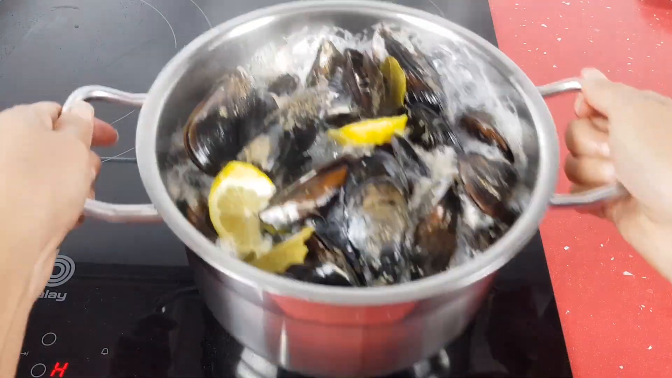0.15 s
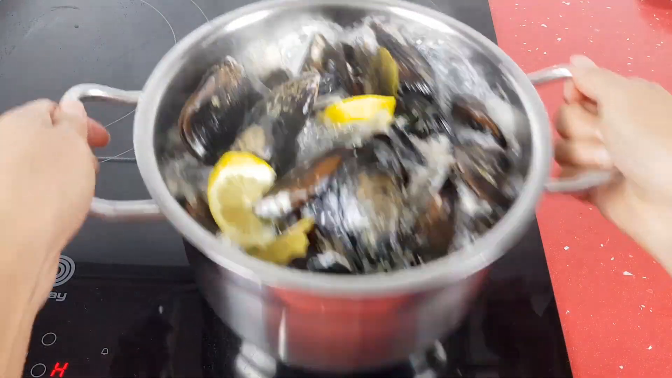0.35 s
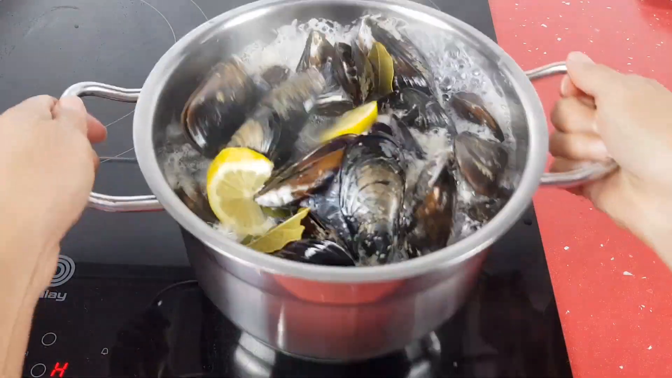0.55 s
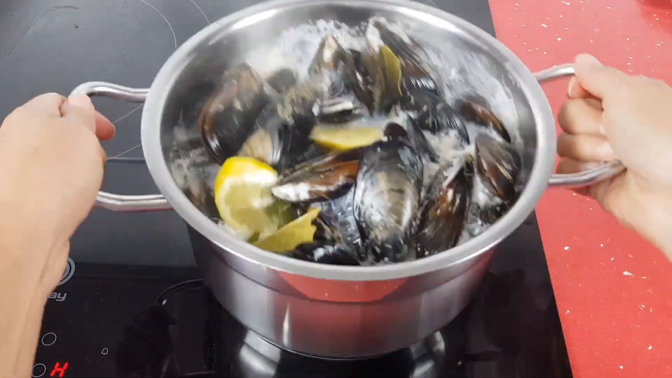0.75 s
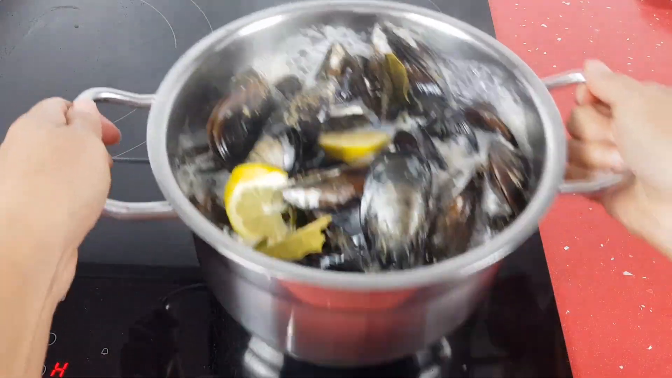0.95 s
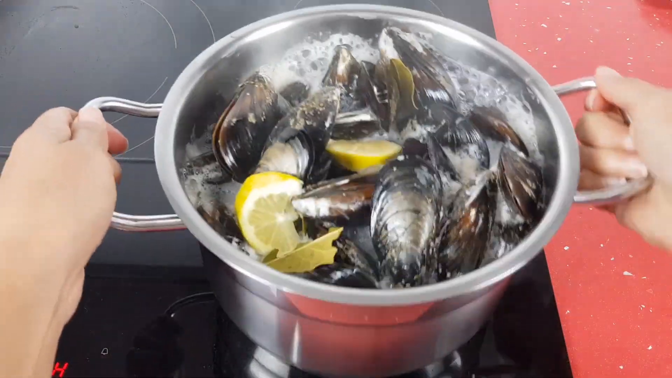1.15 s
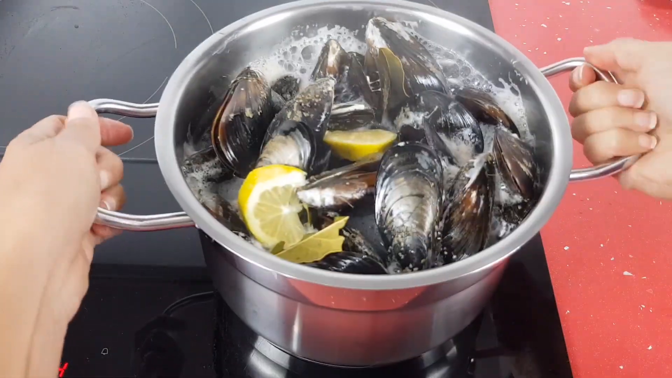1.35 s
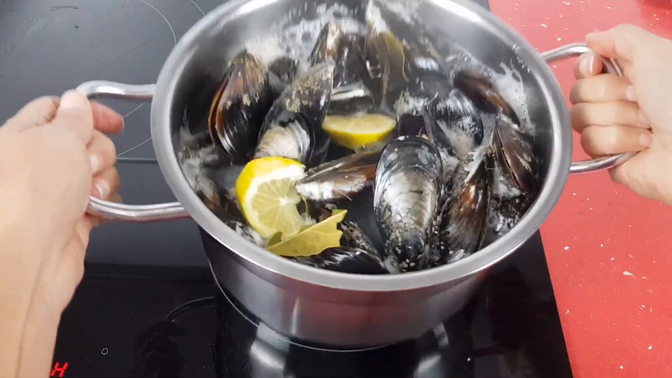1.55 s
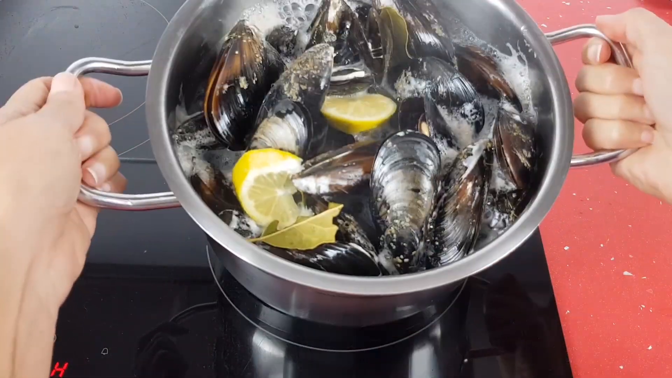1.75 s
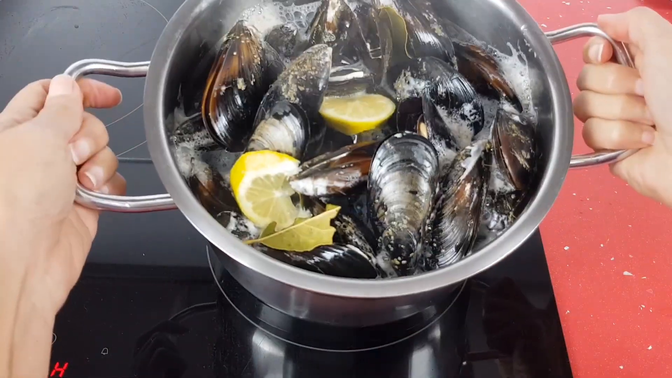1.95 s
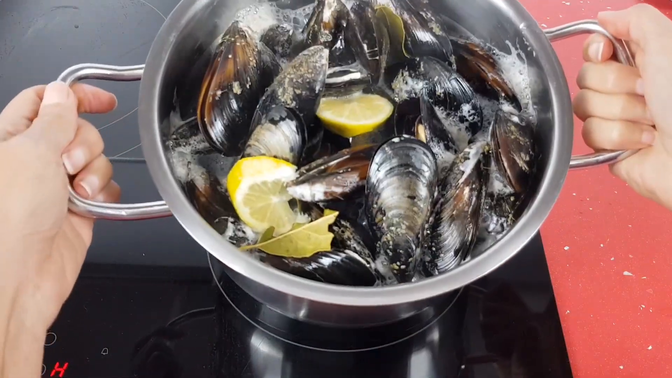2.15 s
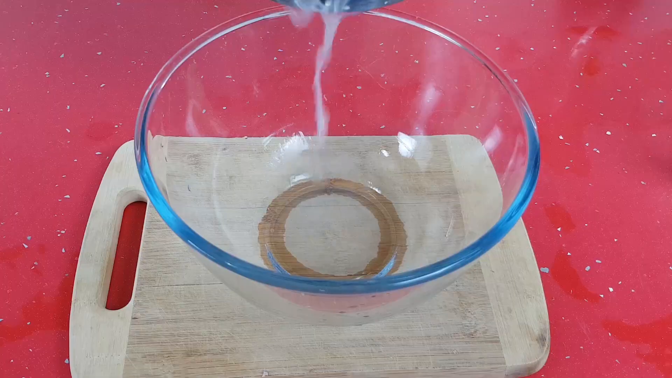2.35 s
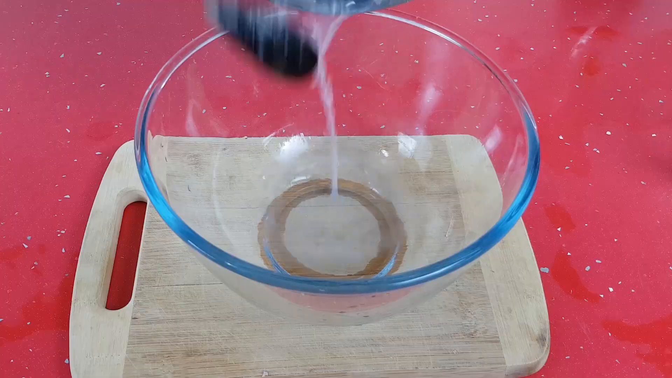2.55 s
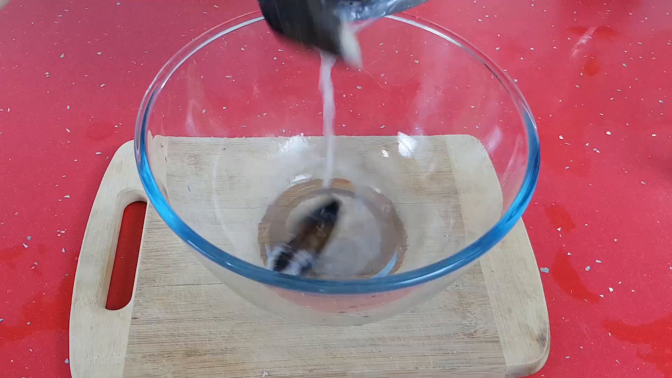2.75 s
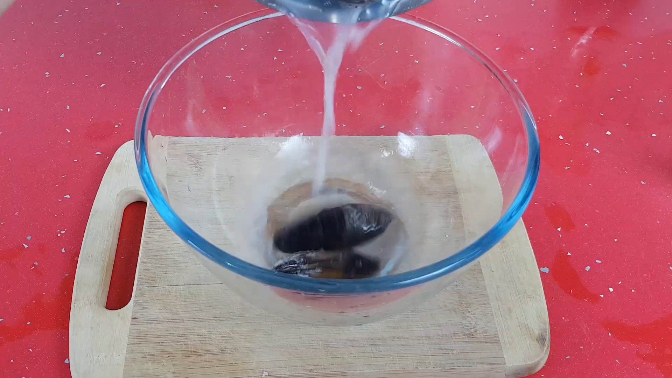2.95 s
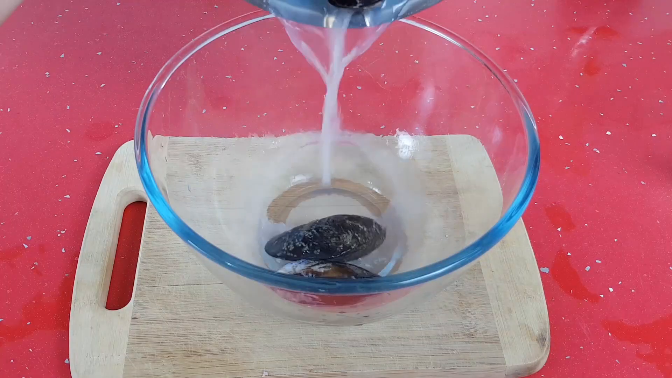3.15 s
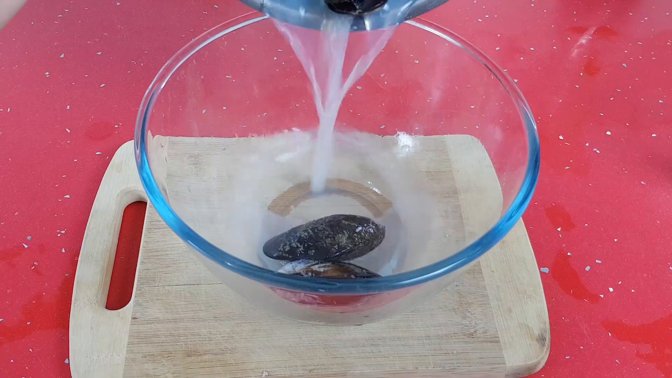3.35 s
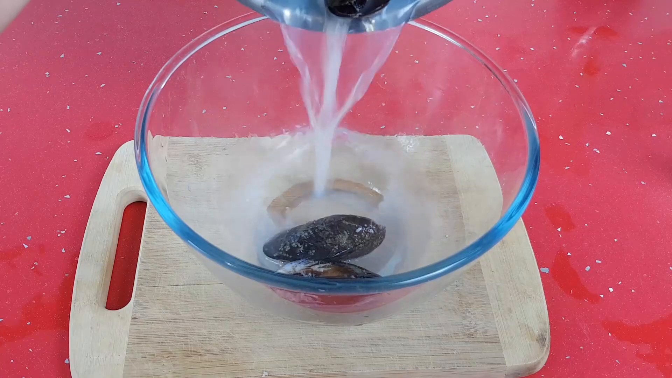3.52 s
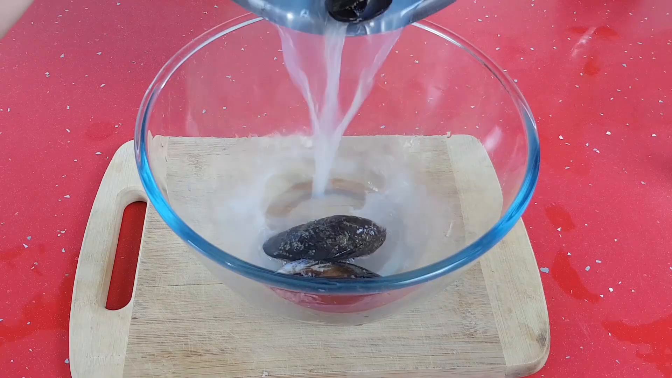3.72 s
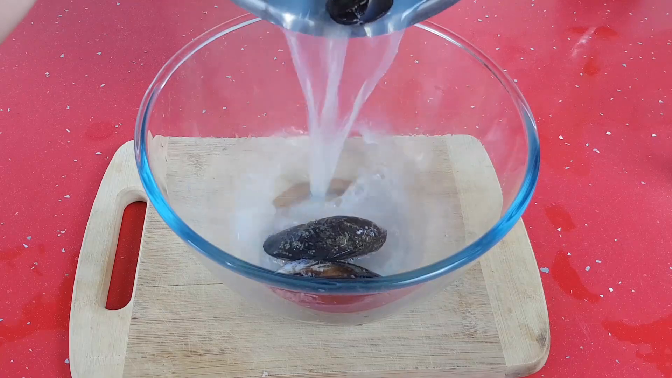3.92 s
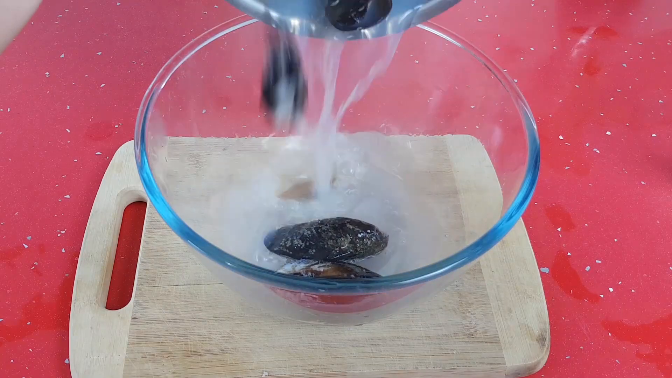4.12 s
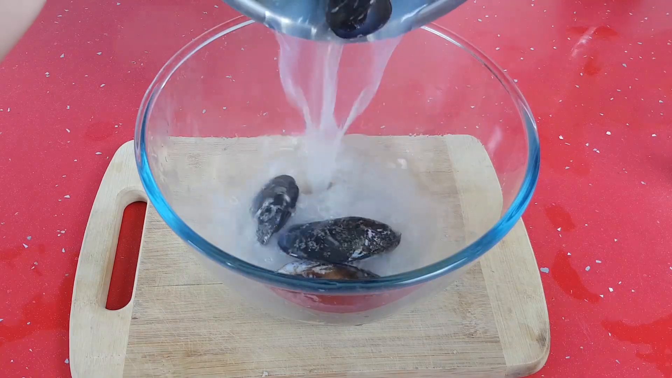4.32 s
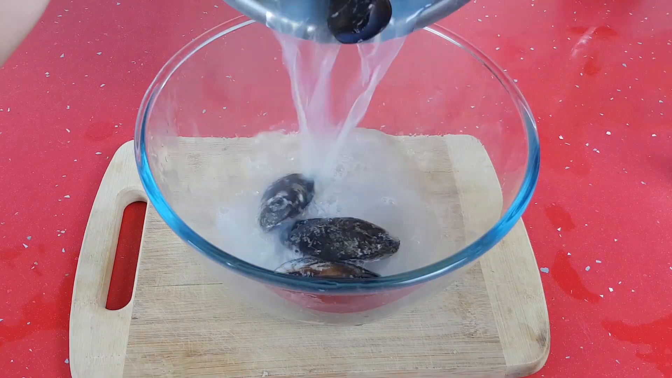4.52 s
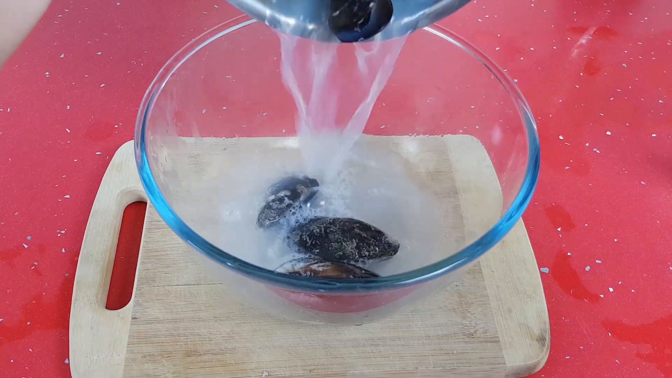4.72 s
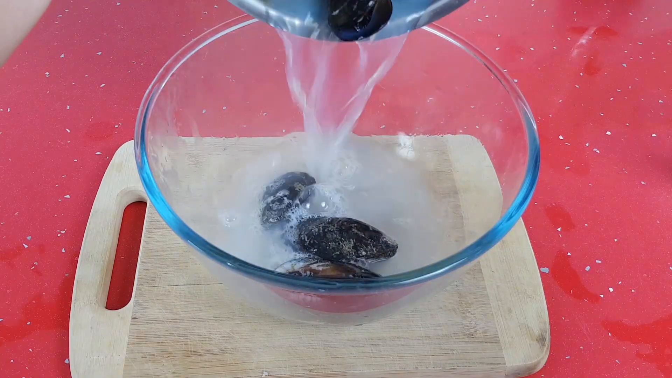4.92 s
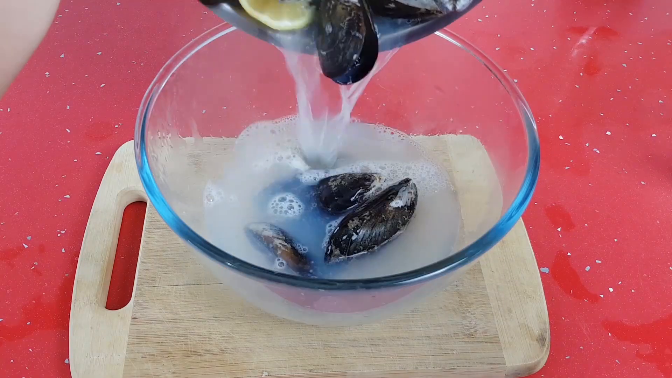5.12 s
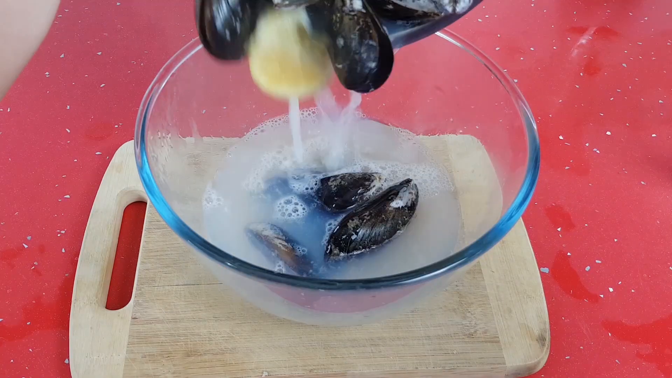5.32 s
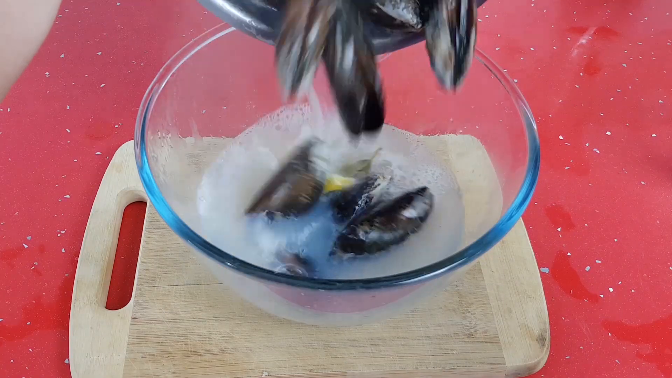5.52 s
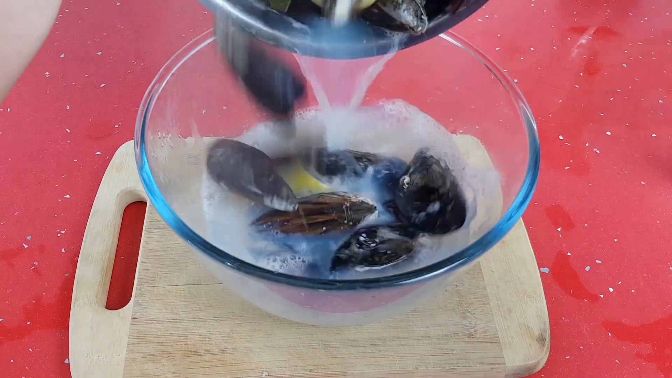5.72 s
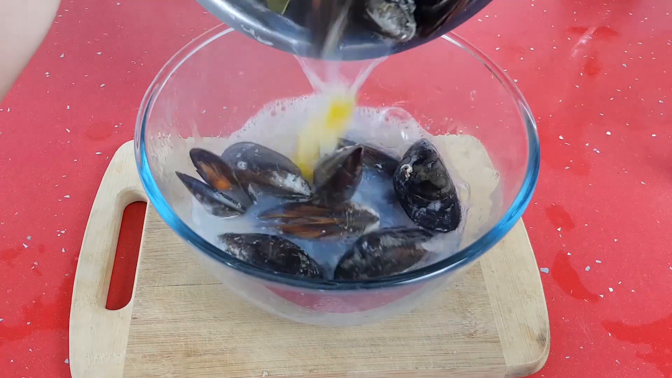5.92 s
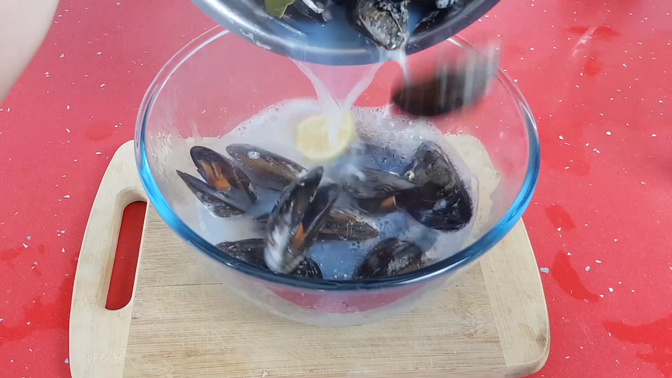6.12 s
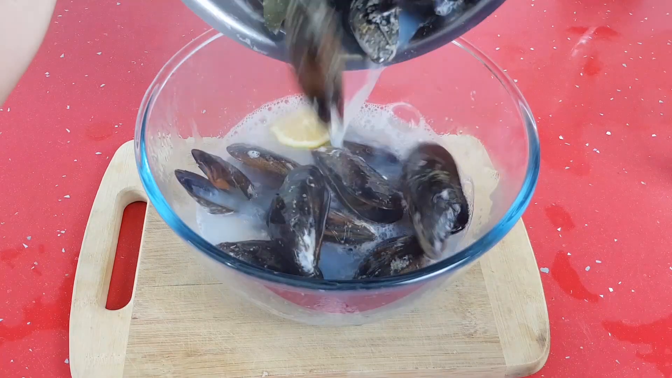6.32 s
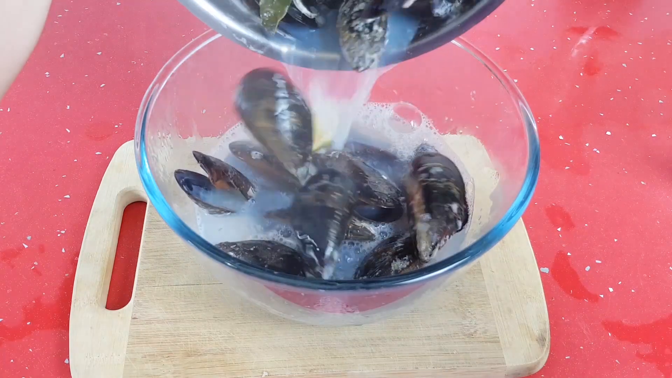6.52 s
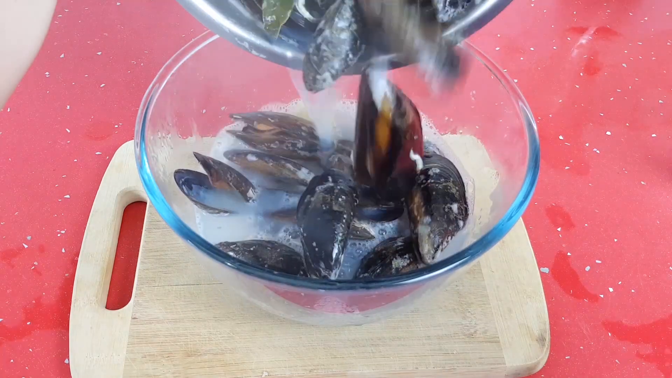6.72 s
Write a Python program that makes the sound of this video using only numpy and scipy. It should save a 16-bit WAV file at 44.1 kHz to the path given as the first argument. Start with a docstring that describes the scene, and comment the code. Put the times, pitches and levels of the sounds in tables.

```python
"""Mussels from pot to bowl

A steel pot of simmering mussels is shaken on a humming hob, then emptied into a glass bowl on a board.
Shells are filtered noise bursts and paired tones: early ones ring bare glass, the rest clatter on the heap.
Broth trickles in as swarms of rising bubble tones and ticks; foam fizzes in the pot before that.
Worktop, bowl and board are banks of dying sines; a small hard kitchen adds a short noise tail."""
import sys
import numpy as np
from scipy import signal
from scipy.fft import rfft, irfft
from scipy.io import wavfile

SR = 44100
rng = np.random.default_rng(int(sys.argv[2]) if len(sys.argv) > 2 else 0)


def digitize_waveform(pressure):
    """Quantize a signal to 16-bit integers and store it at the path in sys.argv[1].

    Rows of a 2-D input are taken as channels; values are limited to [-1, 1].
    """
    field = np.atleast_2d(pressure).T
    bounded = np.clip(field, -1, 1)
    quanta = np.round(bounded * 32767).astype(np.int16)
    wavfile.write(sys.argv[1], SR, quanta)


N = 298557
TIME = np.arange(N) / SR

# All levels are relative: each layer adds its own trim.
# shells landing and colliding; hardness is the sharp edge against the body of the blow:
# (time [s], level [dB], pitch [Hz], hardness [dB])
SHELL_HITS = [(2.387, -30, 1590, -15.5), (2.537, -27, 3260, 1.5), (2.559, -29.5, 1597, -22),
              (2.605, -37.5, 1680, -14), (2.749, -31, 3650, 1), (2.81, -30, 2320, -20),
              (2.82, -23.5, 2470, -11), (2.831, -16, 1723, 6.5), (2.84, -22, 1710, -13),
              (2.99, -31, 1700, -31), (3.046, -18.5, 1556, -1), (3.056, -16.5, 1700, -15),
              (3.061, -19, 1760, 7), (3.076, -18, 670, -5), (3.097, -31, 1720, -14),
              (3.156, -22.5, 1700, -30), (3.17, -16, 3740, -8), (3.177, -27.5, 1610, -18),
              (4.235, -38, 2280, -6), (4.368, -22.5, 2590, -7.5), (4.383, -32.5, 2690, -24),
              (4.406, -39.5, 2360, -4), (4.446, -39, 740, -26), (4.459, -40.5, 1460, -24),
              (5.557, -27, 2045, -6), (5.667, -20.5, 980, -8), (5.736, -21, 2570, 1.5),
              (5.78, -16, 880, -2.5), (5.797, -16, 2760, -20), (5.832, -18.5, 2210, 5),
              (5.84, -17, 920, -4.5), (5.855, -23, 740, -9), (5.865, -22.5, 870, -2.5),
              (5.869, -16.5, 2256, -22), (5.89, -22, 890, -10), (5.897, -24.5, 970, -20),
              (5.943, -14.5, 1386, 1), (5.966, -19.5, 1284, -15), (5.992, -22, 2340, 3),
              (6.036, -23.5, 3090, -2), (6.053, -18, 1297, -3), (6.059, -17.5, 1804, -8),
              (6.129, -25, 1990, -4.5), (6.212, -20, 1800, 4.5), (6.26, -28, 2380, -10),
              (6.304, -31, 1370, -10), (6.345, -14.5, 2160, -9), (6.357, -13.5, 2327, -6),
              (6.564, -26.5, 3950, -10), (6.638, -26.5, 3780, 5), (6.662, -32.5, 2740, 5),
              (6.755, -37, 2040, -25)]
# colour of the shell blows: (frequency [Hz], level [dB])
SHELL_COLOUR = [(100, 5), (250, -17), (400, -2.5), (560, -5), (820, -1), (1150, 1), (1450, 3), (1900, 0),
                (2500, 1), (3600, -2.5), (6000, 1), (9000, -3), (12000, -4), (16000, -9.5)]
# a shell strikes bare glass: (time [s], level [dB])
GLASS_HITS = [(2.538, -58), (2.835, -20.5), (2.838, -13), (3.048, -23), (3.059, -18), (3.173, -40)]
# higher modes of the bowl: (frequency [Hz], level [dB], T60 [s])
BOWL_MODES = [(1380, -36, 0.36), (1590, -28.5, 0.28), (1570, -8.5, 0.19), (1660, -5, 0.16),
              (1840, -7, 0.16), (1910, -13, 0.15), (2400, -27, .2), (2690, -3.5, 0.13), (3400, -15.5, 0.37),
              (4990, -22, 0.64), (6460, -26.5, 0.22), (6500, -13.5, 0.087), (7300, -25.5, 0.11),
              (7900, -0.5, 0.073), (8600, -8.5, 0.08), (8400, -12.5, 0.14), (9120, 5, 0.066),
              (10300, -8, 0.071), (9938, -9, 0.14), (10850, -4.5, 0.23), (11540, -10.5, 0.16),
              (12000, 0.5, 0.1), (12800, -4, 0.17), (14010, -23, .22), (14700, -3, .18), (15720, -32, 0.34)]
# lowest mode of the bowl, the whole rim flexing: (frequency [Hz], level [dB], T60 [s])
RIM_MODE = [(468, -6.5, 1.84)]
# modes of the wooden board under the bowl: (frequency [Hz], level [dB], T60 [s])
BOARD_MODES = [(62, -11, .3), (90, -3.5, 0.47), (128, 3.5, 0.25), (149, 2.5, .14)]
# a loaded bowl presses harder on the board: (time [s], level [dB])
BOARD_LOAD = [(4.4, -2), (5.9, 3)]
# pot knocks on the hob, and shells clinking on its steel wall; a hard blow is bright, a soft one mostly booms:
# (time [s], level [dB], hardness [dB])
POT_KNOCKS = [(0.223, -45, -5.5), (0.326, -41.5, 3), (0.448, -40, -2), (0.557, -39, -3), (0.681, -41, -3.5),
              (0.733, -34.5, 19), (0.786, -38, 7), (0.801, -38.5, 11.5), (0.916, -44, -5),
              (1.02, -42.5, -0.5), (1.138, -40.5, -1), (1.201, -36.5, -2.5), (1.264, -29.5, 5.5),
              (1.535, -63, -23), (1.601, -49, -7.5), (1.711, -53.5, 12.5), (1.811, -56.5, -13)]
# colour of the pot knocks: (frequency [Hz], level [dB])
POT_COLOUR = [(100, 2), (220, -3.5), (340, 2), (480, -1.5), (750, -5), (1200, 2.5), (1800, 1.5), (2500, -2),
              (3500, -4), (5000, 3), (8000, 1.5), (12000, -2), (16000, -7)]
# modes of hob and worktop: (frequency [Hz], level [dB], T60 [s])
WORKTOP_MODES = [(55, -19.5, 0.24), (81.2, 0.5, 0.21), (84.75, 5, 0.7), (106.5, 5, 0.17), (135, -3.5, 0.33),
                 (187.4, -10, 0.44), (312, -16, 0.46), (334.5, -7.5, 0.21), (406, -30, 0.17),
                 (487, -3.5, 0.28)]
# the broth gulps a pocket of air: (time [s], level [dB], starting pitch [Hz], T60 [s])
AIR_GULPS = [(1.711, -24.5, 403, 0.051), (5.668, -15.5, 688, 0.027), (5.866, -12, 802, 0.074),
             (5.95, -28, 960, 0.14), (6.06, -10, 866, 0.028), (6.226, -13.5, 767, 0.078),
             (6.578, -14.5, 847, 0.018)]
# the stream slaps into the shallow broth, lower as it deepens: (time [s], level [dB], bubble pitch [Hz])
SPLASH_HITS = [(3.732, -46, 2460), (3.747, -43, 2500), (3.773, -44.5, 2590), (3.879, -45, 2060),
               (3.905, -51, 2180), (3.99, -51.5, 2540), (4.044, -36, 2960), (4.13, -44.5, 2480),
               (4.293, -49, 2360), (4.756, -57, 1160), (4.883, -53, 970), (5.272, -45, 1150),
               (5.321, -45, 1150), (5.345, -52, 1150)]
# the quick run of bubbles a splash sets off: (delay [s], pitch ratio [1], level [dB])
BUBBLE_RUN = [(0, 1.027, 16.5), (.002, 0.93, 13.5), (.005, 1.1, -5), (.016, 0.98, -7)]
# strength of the falling stream: (time [s], level [dB])
POUR_LEVEL = [(2.4, -50.5), (2.6, -65), (2.85, -41.5), (3.0, -56), (3.4, -74), (3.8, -55.5), (4.0, -75),
              (4.13, -58), (4.46, -54), (4.65, -59), (5.25, -60.5), (5.6, -48.5), (6.77, -52)]
# fine spray, highest where the stream hits a shell: (time [s], level [dB])
SPRAY_LEVEL = [(2.4, -72.5), (2.8, -50.5), (3.4, -71.5), (3.87, -52.5), (4.05, -67.5), (4.4, -55),
               (4.6, -66.5), (4.72, -62), (4.95, -76), (5.3, -55.5), (6.77, -68.5)]
# colour of the stream's bubbles and patter: (frequency [Hz], level [dB])
BURBLE_COLOUR = [(200, -7.5), (330, 3), (480, -3.5), (680, 0.5), (850, -9.5), (1100, 3), (1350, 4),
                 (1650, -7.5), (2100, 1.5), (2450, 3), (2900, -9), (3500, -14), (5000, -4), (8000, -34)]
# colour of the fine spray: (frequency [Hz], level [dB])
SPRAY_COLOUR = [(1500, -36.5), (3000, 6.5), (4500, -9), (7000, 5.5), (10000, -1), (12500, 3.5), (16000, -7)]
# colour of the fizzing foam: (frequency [Hz], level [dB])
FIZZ_COLOUR = [(1500, -30), (3000, -19), (5000, -18), (6500, -8), (8000, -7), (9500, -8), (12000, -5),
               (16000, -8.5)]
# the fizz has a brighter band that sinks as the pot is lifted: (time [s], frequency [Hz])
FIZZ_BAND = [(1.7, 9500), (2.05, 8000)]
# the broth swings as the pot is shaken, and again as it is lifted:
# (start [s], length before the fade [s], level [dB])
SLOSH_SWINGS = [(0.271, 1.114, -51.5), (1.696, 0.027, -42.5)]
# colour of the sloshing broth: (frequency [Hz], level [dB])
SLOSH_COLOUR = [(120, 5), (200, 7), (340, -2), (480, -3), (750, -5.5), (1100, -1), (1600, -9), (2500, -6),
                (4000, -15), (6000, -21), (10000, -41)]
# hum while the pot moves about on the hob: (time [s], level [dB])
HUM_LEVEL = [(0.0, -53.5), (0.26, -56), (0.43, -55), (1.29, -42), (1.81, -57.5), (2.09, -49), (2.36, -52)]
# colour of the still room air: (frequency [Hz], level [dB])
AIR_COLOUR = [(20, -28.5), (48, 7), (70, -17.5), (110, -6.5), (200, -9.5), (450, -14), (750, -21.5),
              (1500, -26.5), (3500, -31), (8000, -28.5), (16000, -33.5)]
# how fast the kitchen's echoes die: (frequency [Hz], T60 [s])
KITCHEN_T60 = [(100, 0.66), (260, 0.33), (700, 0.39), (1840, 0.28), (4850, 0.31), (12800, 0.2)]
# likeness of diffuse sound at the two microphones: (frequency [Hz], correlation [0-1])
MIC_LIKENESS = [(100, 0.93), (300, 0.94), (700, 0.4), (1500, 0.16), (5000, 0.1)]

# between these times [s] a landing goes from lone shell to shell on the heap
FILL_S = (2.84, 3.3)
# lone, then on the heap: knock [dB re ring] and thud [dB re shell level]
CLACK_KNOCK_DB, CLACK_THUD_DB = (-6.5, 2), (-14, -9.5)
# shells lower than this pitch thud more
SHELL_HZ, WEIGHT_DB_PER_OCTAVE = 1800, 3
# broth covers the bottom of the bowl and mutes the glass
MUTE_AT_S, MUTE_OVER_S, MUTED_DB = 3.38, 0.16, -15
# what thud and boom lose per dB of a pot knock's hardness
THUD_LOSS, BOOM_LOSS = 0.49, 0.77
SLOSH_RISE_S, SLOSH_FADE_DB_PER_S = 0.022, 141
FOAM_RISE_S, FOAM_DB, FOAM_FADE_DB_PER_S = 0.072, -61.5, 1
# the fizz ends and the hum starts sinking to its far level
LEAVE_S, FAR_HUM_DB, HUM_FADE_S = 2.4, -61.5, 0.3
EDGE_HZ = 16000  # upper band limit


def shells(clack_db=0.0, left_db=0.2, bowl_db=-53, rim_db=-62, board_db=-34, room_db=-4):
    """Each shell cracks and rings briefly; the blow faintly drives the modes of bowl and board."""
    out, pushes = np.zeros((2, N)), np.zeros(N)
    for s, db, hz, hard_db in SHELL_HITS:
        load_db = np.interp(s, *np.transpose(BOARD_LOAD))
        add(out, s, amp(db + clack_db) * clack(s, hz, hard_db))
        add(pushes, s, amp([db + board_db + load_db]))
    balance = amp([[left_db / 2], [-left_db / 2]])
    out = colour(balance * out, SHELL_COLOUR)
    bowl = amp(bowl_db) * convolve(out, ring(BOWL_MODES))
    rim = amp(rim_db) * convolve(out, ring(RIM_MODE, size=80000)) / 2
    out += free_glass() * (bowl + rim)
    return out + amp(room_db) * kitchen(out) + convolve(pushes, ring(BOARD_MODES))


def clack(s, hz, hard_db, shell_t60=0.038, cycles=36):
    """One shell lands: small ones die sooner, heavy ones thud, and a fuller bowl turns ring into knock."""
    knock_db = np.interp(s, FILL_S, CLACK_KNOCK_DB)
    ring_db = -10 * np.log10(1 + amp(knock_db) ** 2)  # ring and knock share the strength
    thud_db = np.interp(s, FILL_S, CLACK_THUD_DB) + WEIGHT_DB_PER_OCTAVE * np.log2(SHELL_HZ / hz)
    tone = amp(ring_db) * valves(hz, min(shell_t60, cycles / hz))
    return tone + contact(ring_db + knock_db, thud_db, hard_db, 0.0014, 0.01, 1.0, size=310)


def valves(hz, t60, twin_db=-4, rise_s=0.00075):
    """The two halves of a shell ring at slightly different pitches and die together."""
    t = TIME[:4096]
    twin_hz = hz * (1 + rng.choice([-1, 1]) * rng.uniform(0.096, 0.16))
    twin = np.sin(2 * np.pi * (twin_hz * t + rng.random((2, 1))))
    pair = np.sin(2 * np.pi * hz * t) + amp(twin_db) * twin
    envelope = amp(-60 * t / t60) * (1 - np.exp(-t / rise_s))
    return burst(pair * envelope, size=310)


def glass(ring_db=-7, swing_db=-23.5, chatter_db=1, chatter_s=0.034, room_db=-6):
    """A shell chatters on the bare wall, the high modes ring out, and broth damps the swing of the rim."""
    out, swing = np.zeros((2, N)), np.zeros(N)
    rim_hz, rim_db, rim_t60 = RIM_MODE[0]
    for s, db in GLASS_HITS:
        modes = ring(BOWL_MODES)
        hiss = band(rng.standard_normal(modes.shape), [3500, 13000], "bandpass")
        chatter = hiss * np.exp(-TIME[:modes.shape[1]] / chatter_s)
        add(out, s, amp(db + ring_db) * (modes + amp(chatter_db) * chatter))
        # each strike feeds the same swing of the rim
        add(swing, s, amp(db + swing_db + rim_db - 60 * TIME[:2 * SR] / rim_t60))
    rim = free_glass() * swing * np.sin(2 * np.pi * rim_hz * TIME)
    return out + amp(room_db) * kitchen(out) + rim


def free_glass():
    """How freely the bowl can ring: fully, until broth over its bottom damps it."""
    return amp(MUTED_DB * ramp(MUTE_AT_S, MUTE_OVER_S))


def pot(knock_db=-1, thud_db=0, edge_db=-12, boom_db=5.0, rattle_db=-6, rattle_s=0.032,
        room_db=-1, boom_room_db=-6):
    """The pot rocks on the hob; each knock sets the worktop booming and jolts the shells inside."""
    knocks, pushes, jolts = np.zeros((2, N)), np.zeros(N), np.zeros(N)
    for s, db, hard_db in POT_KNOCKS:
        blow = contact(0, thud_db - THUD_LOSS * hard_db, edge_db + hard_db, 0.0023, 0.0087, 1.0, size=880)
        add(knocks, s, amp(db + knock_db) * blow)
        add(pushes, s, amp([db + boom_db - BOOM_LOSS * hard_db]) / 2)
        add(jolts, s, amp(db + rattle_db) * np.exp(-TIME[:SR] / rattle_s))
    rattle = jolts * unit(band(ticks(170, 26, 0.00042), [700, 4500], "bandpass", order=1))
    knocks = colour(knocks + rattle, POT_COLOUR)
    booms = convolve(pushes, ring(WORKTOP_MODES))
    return knocks + amp(room_db) * kitchen(knocks) + booms + amp(boom_room_db) * kitchen(booms)


def contact(knock_db, thud_db, edge_db, crack_s, thud_s, apart, size):
    """One blow: a knock, a dull thud and a sharp edge, each a noise burst that dies in milliseconds."""
    t = TIME[:4096]
    shared, own = rng.standard_normal(len(t)), rng.standard_normal((2, len(t)))
    grit = (shared + apart * own) * (1 - np.exp(-t / 0.00012))
    thud = band(shared * np.exp(-t / thud_s), [190, 680], "bandpass", order=3)
    knock = band(grit * np.exp(-t / (2 * crack_s)), [700, 3400], "bandpass", order=3)
    edge = band(grit * np.exp(-t / crack_s), 3800, "highpass", order=3)
    blow = amp(knock_db) * burst(knock, size) + amp(thud_db) * burst(thud, size)
    return blow + amp(edge_db) * burst(edge, size)


def plops(room_db=-4):
    """Large pockets of air gulp in the broth, first in the lifted pot, later under falling shells."""
    out = np.zeros((2, N))
    for s, db, hz, t60 in AIR_GULPS:
        add(out, s, amp(db) * bubble(hz, t60, 0.019))
    return out + amp(room_db) * kitchen(out)


def splashes(slap_db=-5, thud_db=-20, edge_db=-9, cycles=20, room_db=-3):
    """Each splash is a wet slap and a quick run of ever weaker bubbles of nearly one size."""
    out = np.zeros((2, N))
    for s, db, hz in SPLASH_HITS:
        add(out, s, amp(db) * contact(slap_db, thud_db, edge_db, 0.00064, 0.0017, 1.0, size=310))
        for late_s, ratio, bubble_db in BUBBLE_RUN:
            add(out, s + late_s, amp(db + bubble_db) * bubble(hz * ratio, cycles / hz, 0.033))
    return out + amp(room_db) * kitchen(out)


def broth(bubbles_db=0, patter_db=-7, spray_db=-1, bowl_db=-38, room_db=-3):
    """The stream bubbles, patters, throws fine ticking spray and sets the nearly empty bowl singing."""
    bubbles = drops(450, 330, 4200, 13, 7)
    patter = ticks(600, 7.7, 0.00052)
    droplets = ticks(260, 9, .0004)
    stream = amp(bubbles_db) * unit(colour(bubbles, BURBLE_COLOUR))
    stream += amp(patter_db) * unit(colour(patter, BURBLE_COLOUR))
    wet = follow(POUR_LEVEL) * stream
    spray = follow(SPRAY_LEVEL) * unit(colour(droplets + .5 * patter, SPRAY_COLOUR))
    out = wet + amp(spray_db) * spray
    # squared: muted twice as deep in dB
    out += amp(bowl_db) * free_glass() ** 2 * convolve(wet, ring(BOWL_MODES))
    return out + amp(room_db) * kitchen(out)


def foam(fizz_db=-2, band_db=5, band_width_hz=900, slosh_db=-2, room_db=-2):
    """Foam fizzes as fine ticks from the first knock on; shaken broth sloshes as a bubble swarm."""
    first_s = POT_KNOCKS[0][0]
    settling = amp(FOAM_DB - FOAM_FADE_DB_PER_S * (TIME - first_s))
    fizz = settling * ramp(first_s, FOAM_RISE_S) * (TIME < LEAVE_S)
    slosh = np.zeros(N)
    for s, length_s, db in SLOSH_SWINGS:
        fade_db = SLOSH_FADE_DB_PER_S * np.maximum(TIME - s - length_s, 0)
        slosh += ramp(s, SLOSH_RISE_S) * amp(db - fade_db)
    hiss = colour(ticks(2500, 1.9, .0004), FIZZ_COLOUR)
    bright = resonate(hiss, np.interp(TIME, *np.transpose(FIZZ_BAND)), band_width_hz)
    out = amp(fizz_db) * fizz * unit(hiss + amp(band_db) * bright)
    out += amp(slosh_db) * slosh * unit(colour(drops(1200, 217, 6100, 9.2, 0.78), SLOSH_COLOUR))
    return out + amp(room_db) * kitchen(out)


def bubble(hz, t60, glide):
    """A pocket of air rings and rises in pitch as it nears the surface."""
    t = TIME[:int(t60 * SR) + 2]
    envelope = amp(-60 * t / t60) * (1 - np.exp(-t * hz))
    return envelope * np.sin(2 * np.pi * hz * t * (1 + glide * t / t60))


def drops(per_s, low_hz, high_hz, cycles, spread_db, count=32):
    """A swarm of small bubbles of many sizes, scattered in time and from side to side."""
    out = np.zeros((2, N))
    for hz in np.geomspace(low_hz, high_hz, count):
        grain = bubble(hz, cycles / hz, 0.21) * hz / low_hz
        for when, size, side in rng.random((int(per_s * N / SR / count), 3)):
            gain = amp(spread_db * min(-np.log(size), 3))  # a few are louder than the rest
            add(out, when * N / SR, gain * np.outer([.5 + side, 1.5 - side], grain))
    return unit(out)


def ticks(per_s, spread_db, tick_s):
    """Random impulses of uneven strength, each a very short broad tick of dying noise."""
    strength = amp(spread_db * np.minimum(rng.exponential(1, N), 3.5))
    hits = strength * (rng.random(N) < per_s / SR)
    envelope = signal.lfilter([1], [1, -np.exp(-1 / (tick_s * SR))], hits)
    noise = rng.standard_normal(N) + 4.6 * rng.standard_normal((2, N))  # shared + each side's own
    return unit(envelope * noise)


def ring(modes, size=24000):
    """Modes as dying sines; the higher ones reach the two microphones out of step."""
    t = TIME[:size]
    out = 0
    for hz, db, t60 in modes:
        phase = min(hz / 2500, 2) * (2 * rng.random((2, 1)) - 1)
        out = out + amp(db - 60 * t / max(t60, .005)) * np.sin(2 * np.pi * hz * t + phase)
    return out


def kitchen(x, rise_s=0.00058, shift_s=.19, size=24000):
    """Dense noise tails whose bands die at their own speeds; sound swings between two echo patterns."""
    out, turn = 0, np.pi * TIME / shift_s
    for share in (np.cos(turn), np.sin(turn)):
        hz, t, z = signal.stft(diffuse(rng.standard_normal((2, size))), SR, nperseg=256)
        decay = amp(-60 * t / read(KITCHEN_T60, hz)[:, None])
        tail = signal.istft(z * decay, SR, nperseg=256)[1][:, :size]
        tail *= 1 - np.exp(-(TIME[:size] / rise_s) ** 2)
        out = out + convolve(x * share, tail / np.linalg.norm(tail[0]))
    return out


def background(mains_hz=50.0, hum_db=0, fundamental_db=-69, octave_db=-20, air_db=-63):
    """Mains hum, strongest at twice the mains rate, over the still air of the room as coloured noise."""
    turn, away = 2 * np.pi * mains_hz * TIME, ramp(LEAVE_S, HUM_FADE_S)
    near = amp(hum_db + np.interp(TIME, *np.transpose(HUM_LEVEL)))
    level = (1 - away) * near + away * amp(FAR_HUM_DB)
    hum = level * unit(np.sin(2 * turn) + amp(octave_db) * np.sin(4 * turn))
    air = unit(colour(diffuse(rng.standard_normal((2, N))), AIR_COLOUR))
    return hum + amp(fundamental_db) * unit(np.sin(turn)) + amp(air_db) * air


def diffuse(pair):
    """Makes two unrelated channels alike in the bass, as at two nearby microphones."""
    a, b = rfft(pair)
    same = np.clip(read(MIC_LIKENESS, np.fft.rfftfreq(pair.shape[1], 1 / SR)), -1, 1)
    return irfft([a, same * a + np.sqrt(1 - same ** 2) * b], pair.shape[1])


def amp(db):
    """Decibels to gain."""
    return 10 ** (np.asarray(db) / 20)


def unit(x):
    """Scales to rms 1."""
    return x / np.sqrt(np.mean(x ** 2) + 1e-20)


def burst(x, size):
    """Scales a blow so its first size samples have rms 1."""
    return x / np.sqrt(np.mean(x[..., :size] ** 2) + 1e-20)


def ramp(start_s, length_s):
    """Goes from 0 to 1."""
    return np.clip((TIME - start_s) / length_s, 0, 1)


def read(points, hz):
    """Reads a spectrum on a log-frequency axis."""
    f, value = np.transpose(points)
    return np.interp(np.log(hz + 1), np.log(np.abs(f) + 1), value)


def follow(rows):
    """The gain curve of a table of levels; silent before its first row."""
    s, db = np.transpose(rows)
    return amp(np.interp(TIME, s, db)) * (TIME >= s[0])


def add(mix, s, sound):
    """Mixes a sound in at time s."""
    part = mix[..., max(round(s * SR), 0):][..., :sound.shape[-1]]
    part += sound[..., :part.shape[-1]]


def convolve(x, response):
    """Passes each channel through a response."""
    return signal.fftconvolve(np.atleast_2d(x), np.atleast_2d(response), axes=1)[:, :N]


def band(x, hz, kind, order=2):
    """Butterworth filter."""
    return signal.sosfilt(signal.butter(order, hz, kind, fs=SR, output="sos"), x)


def colour(x, points, size=4096):
    """Causal minimum-phase filter with the given spectrum."""
    db = np.maximum(read(points, abs(np.fft.fftfreq(size, 1 / SR))), -100)
    spectrum = np.exp(np.conj(signal.hilbert(np.log(amp(db)))))
    return convolve(x, np.fft.ifft(spectrum).real[:size // 2])


def resonate(x, hz, width_hz):
    """A resonance that follows the curve hz: shift down to zero, smooth, shift back."""
    turn, r = np.exp(2j * np.pi * np.cumsum(hz) / SR), np.exp(-np.pi * width_hz / SR)
    return 2 * (turn * signal.lfilter([1 - r], [1, -r], x / turn)).real


def scene():
    """Everything at the two microphones."""
    return shells() + glass() + pot() + plops() + splashes() + broth() + foam() + background()


def record(dry, left_db=0.0, low_cut_hz=42):
    """Sound reaches the right microphone a little later; rumble is cut, peaks round off, treble is limited."""
    lag, ceiling = 3, .88  # samples, full scale 1
    pair = np.array([amp(left_db) * dry[0], amp(-left_db) * np.pad(dry[1], (lag, 0))[:N]])
    pair = ceiling * np.tanh(band(pair, low_cut_hz, "highpass", order=5) / ceiling)
    limit = signal.firwin(151, EDGE_HZ, window=("kaiser", 8), fs=SR)
    return signal.oaconvolve(pair, limit[None], "same", axes=1)


dry = scene()
out = record(dry)
digitize_waveform(out)
```